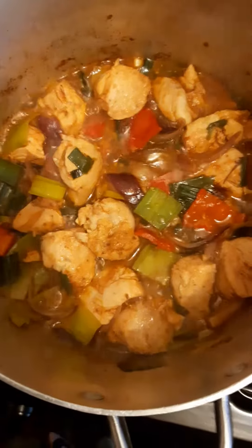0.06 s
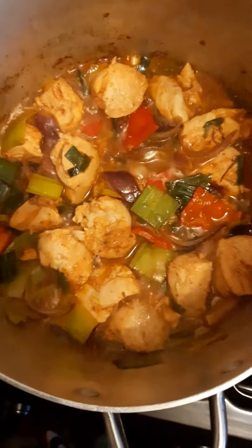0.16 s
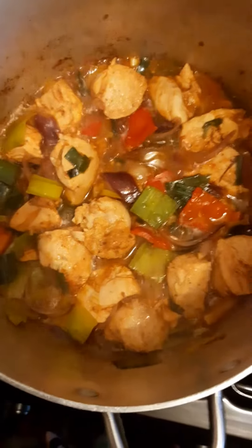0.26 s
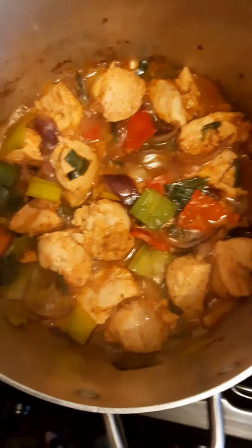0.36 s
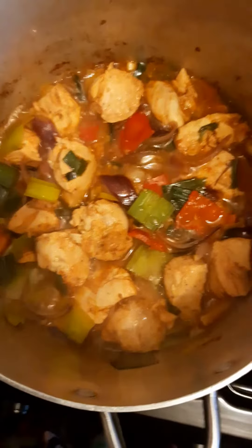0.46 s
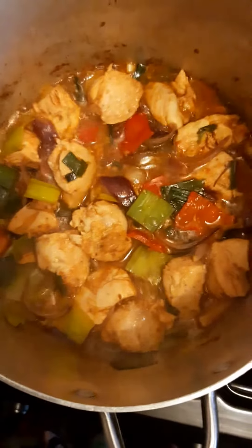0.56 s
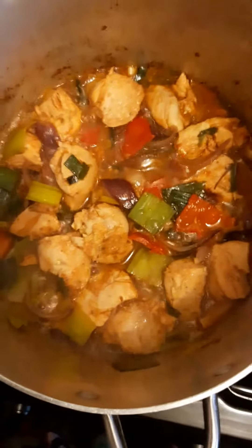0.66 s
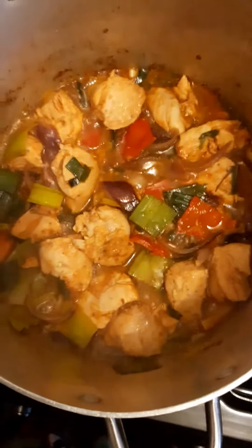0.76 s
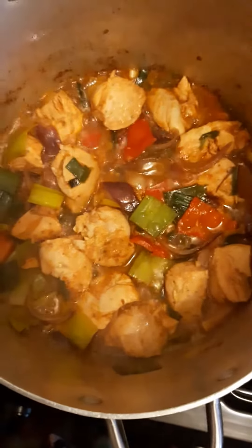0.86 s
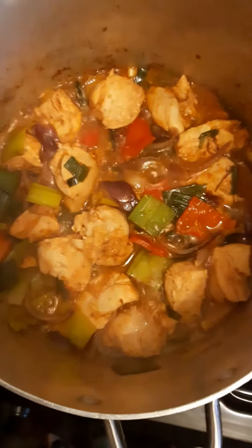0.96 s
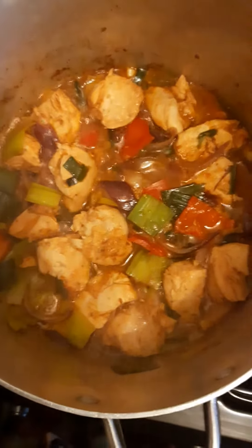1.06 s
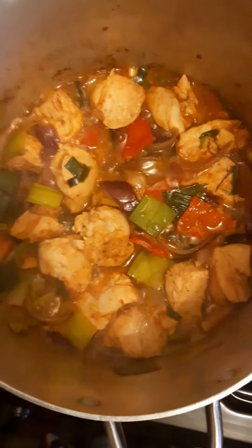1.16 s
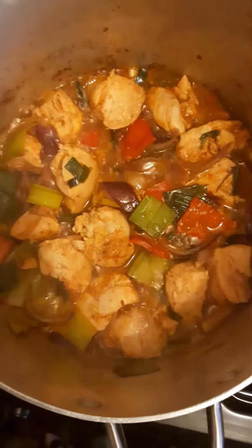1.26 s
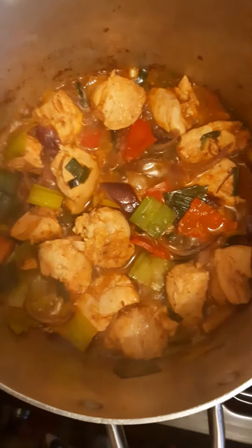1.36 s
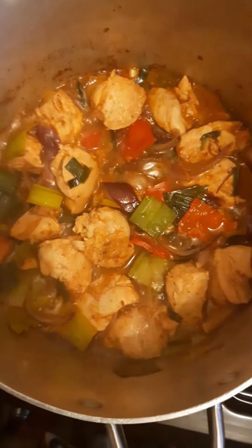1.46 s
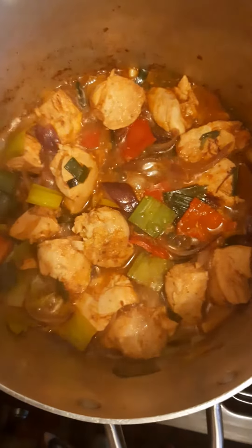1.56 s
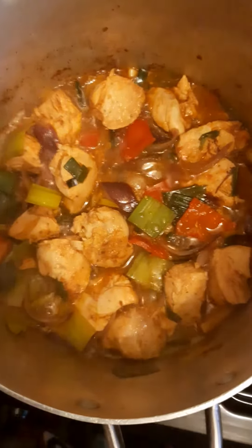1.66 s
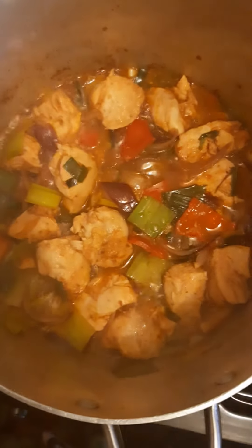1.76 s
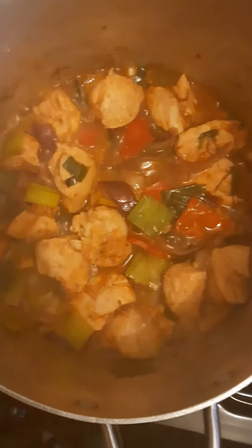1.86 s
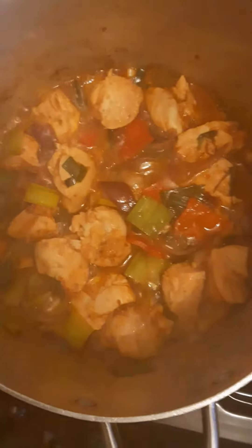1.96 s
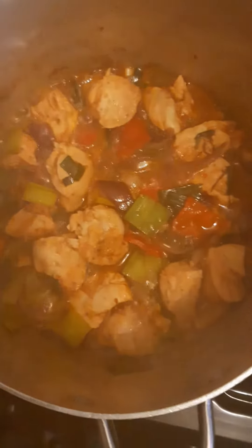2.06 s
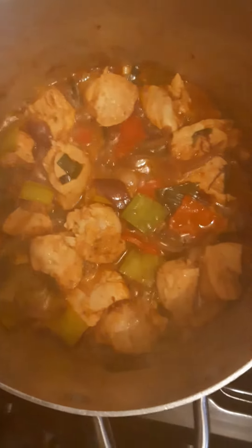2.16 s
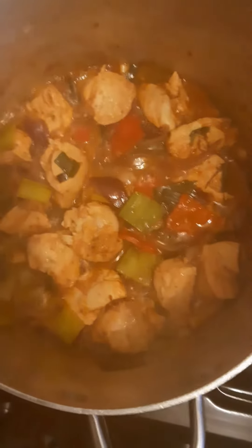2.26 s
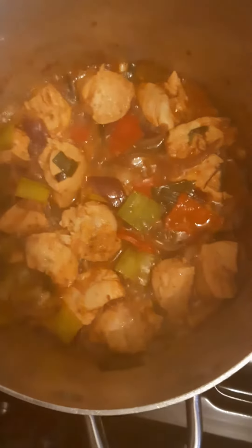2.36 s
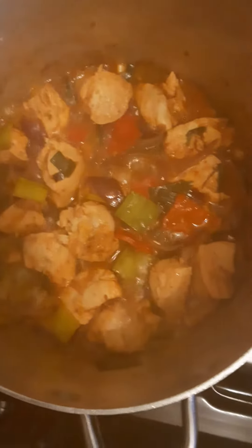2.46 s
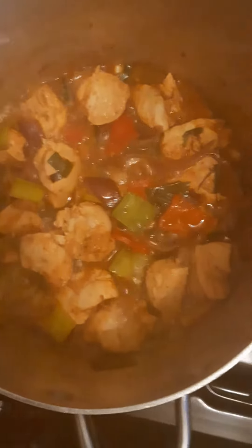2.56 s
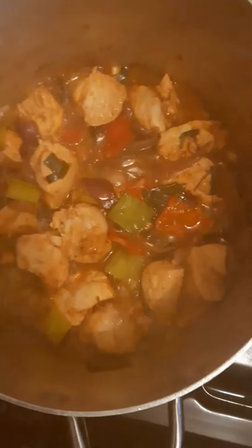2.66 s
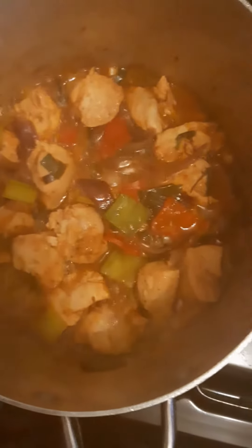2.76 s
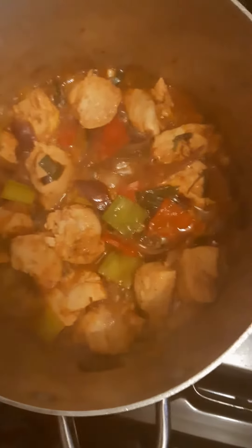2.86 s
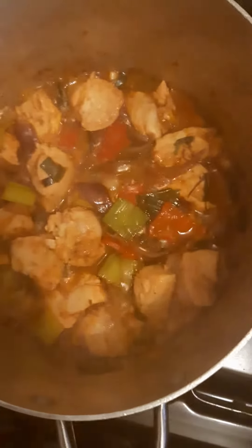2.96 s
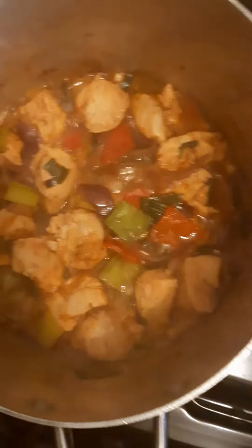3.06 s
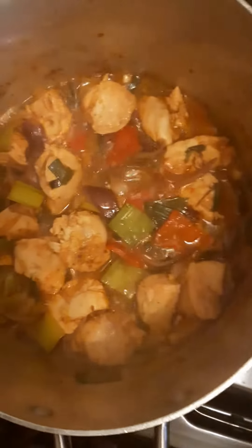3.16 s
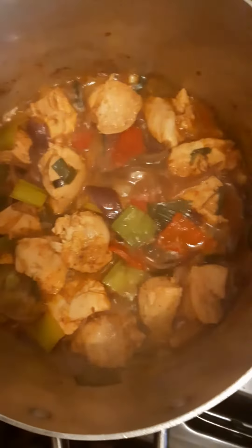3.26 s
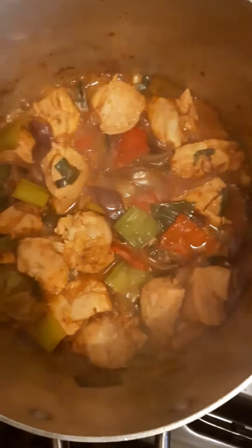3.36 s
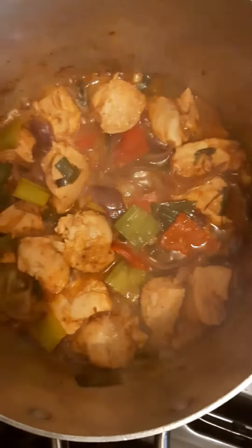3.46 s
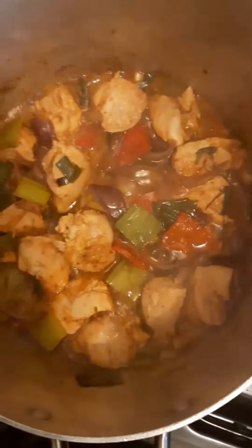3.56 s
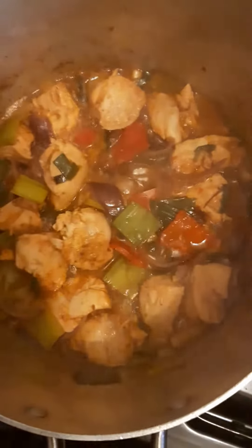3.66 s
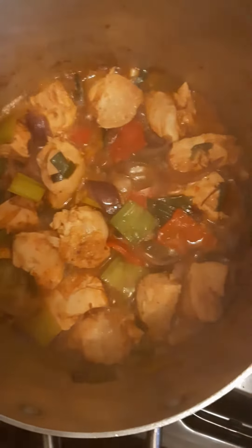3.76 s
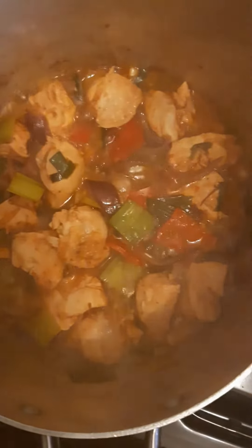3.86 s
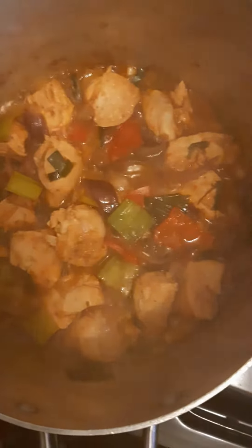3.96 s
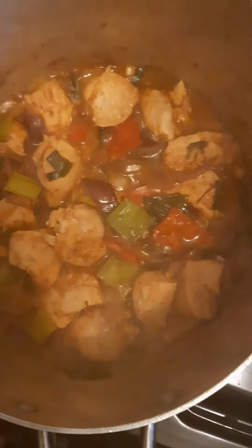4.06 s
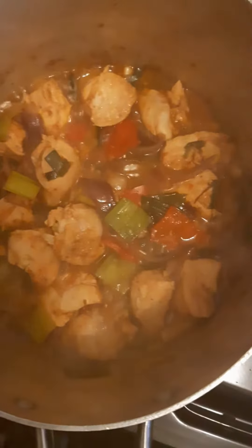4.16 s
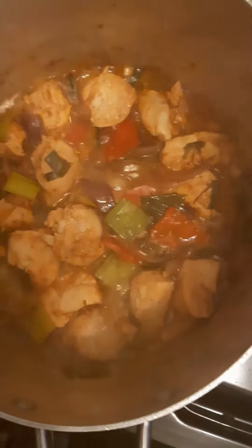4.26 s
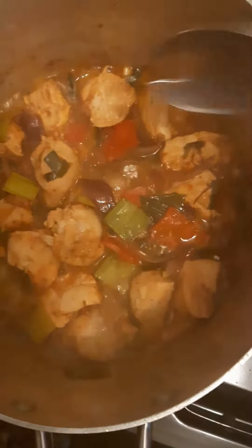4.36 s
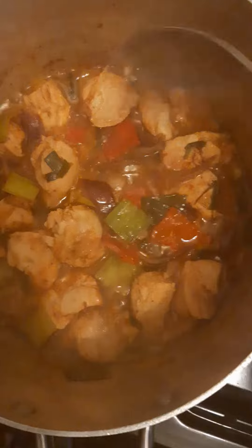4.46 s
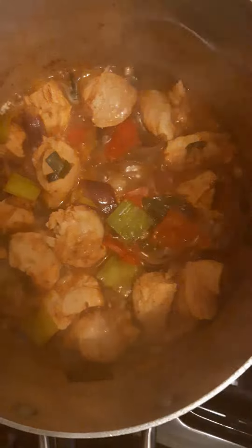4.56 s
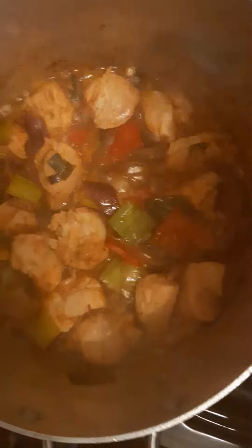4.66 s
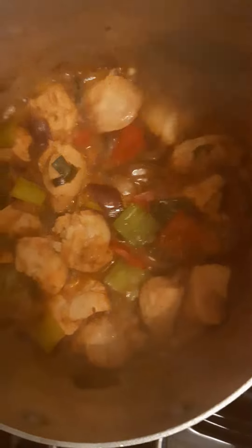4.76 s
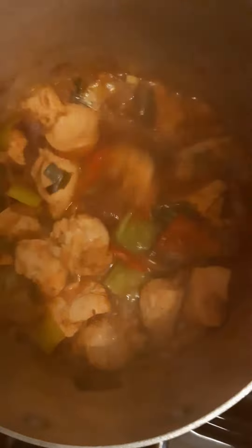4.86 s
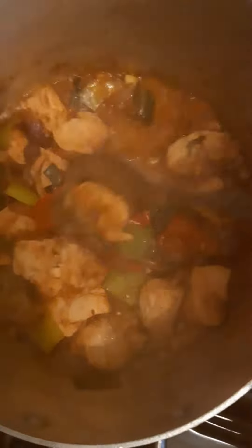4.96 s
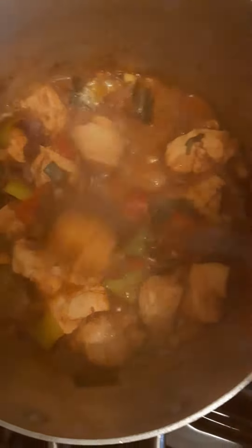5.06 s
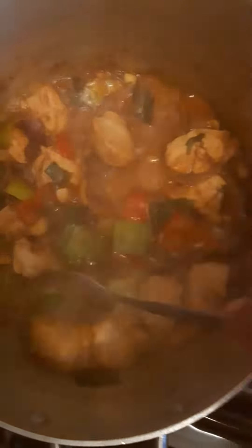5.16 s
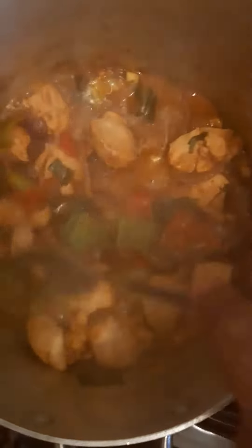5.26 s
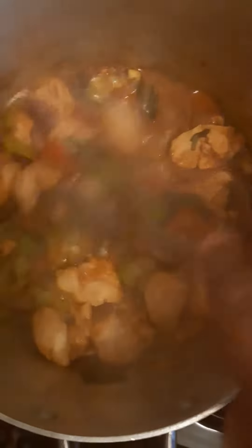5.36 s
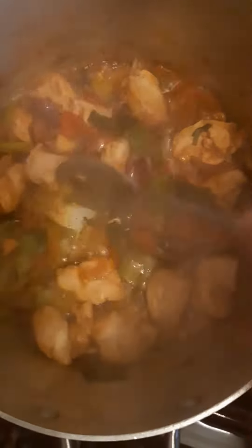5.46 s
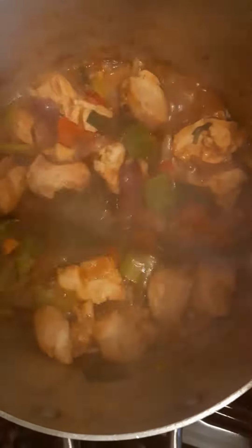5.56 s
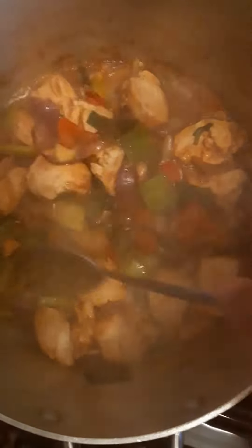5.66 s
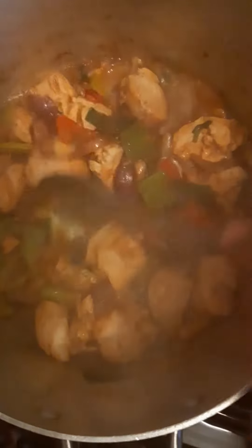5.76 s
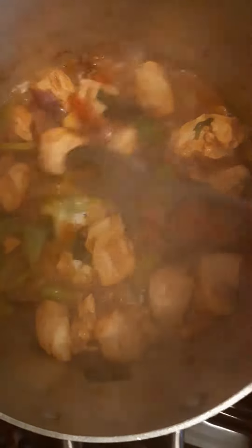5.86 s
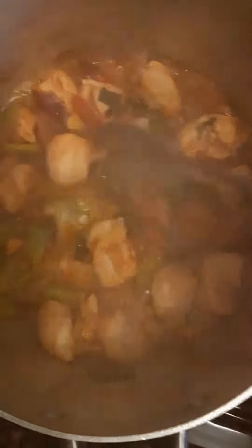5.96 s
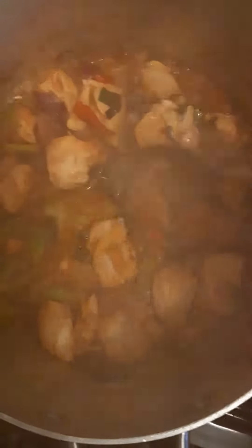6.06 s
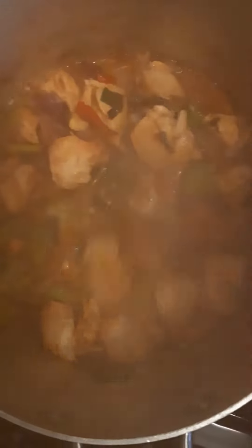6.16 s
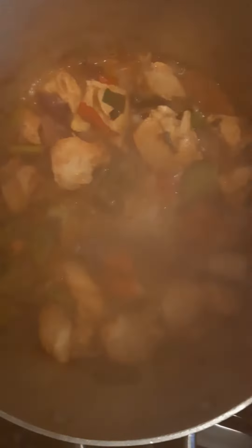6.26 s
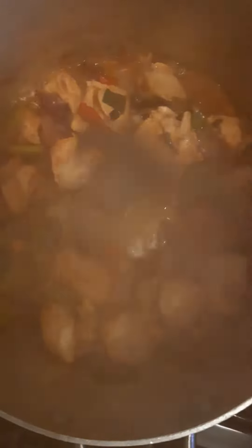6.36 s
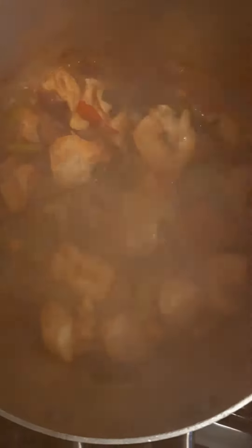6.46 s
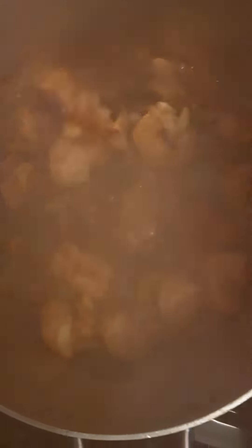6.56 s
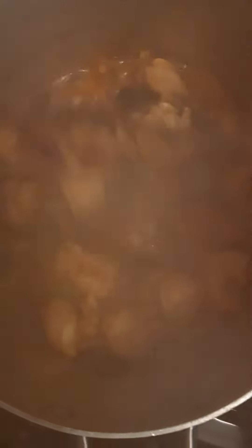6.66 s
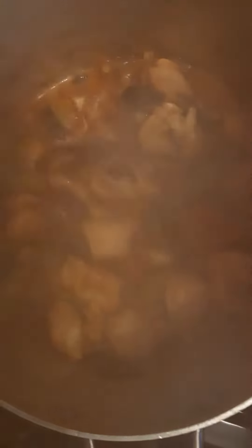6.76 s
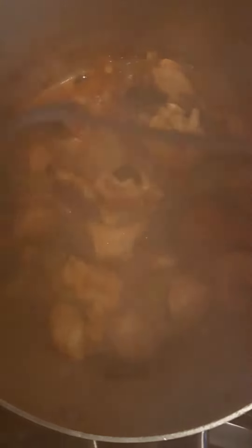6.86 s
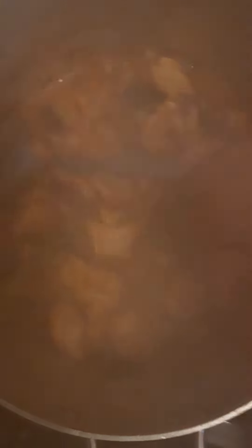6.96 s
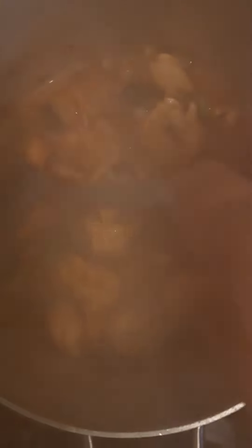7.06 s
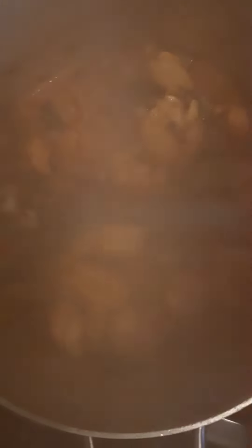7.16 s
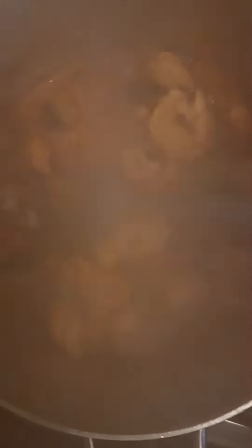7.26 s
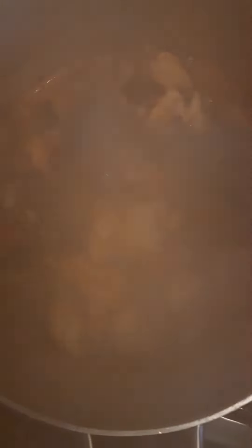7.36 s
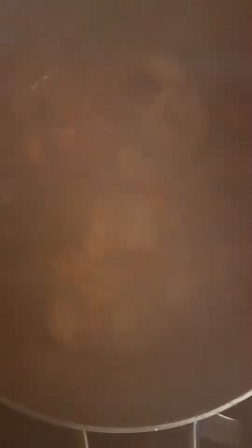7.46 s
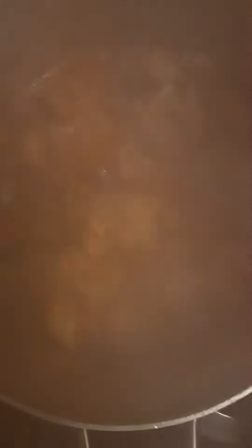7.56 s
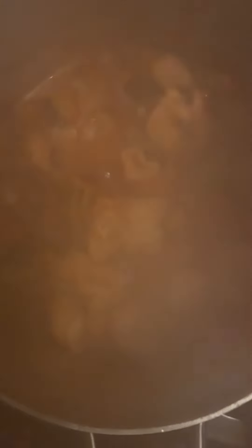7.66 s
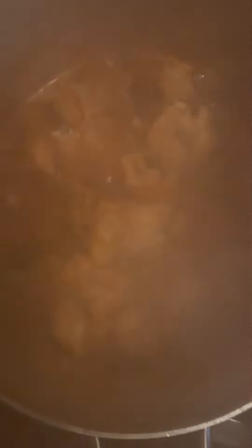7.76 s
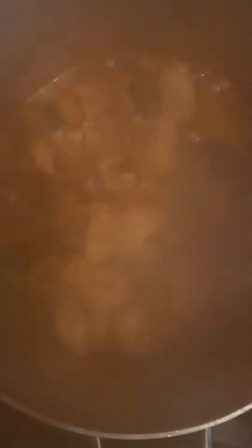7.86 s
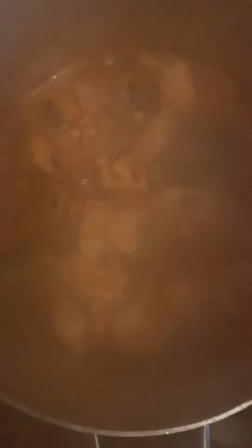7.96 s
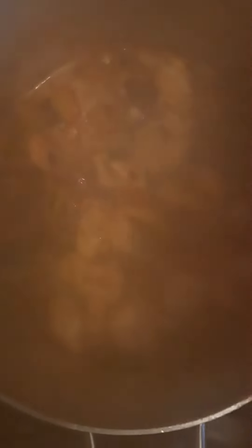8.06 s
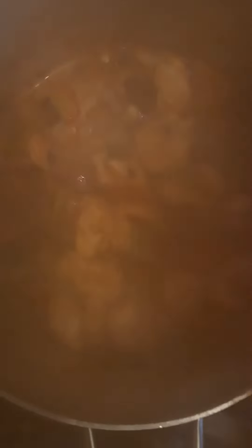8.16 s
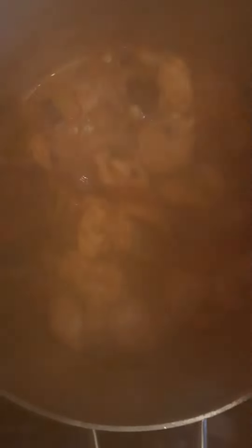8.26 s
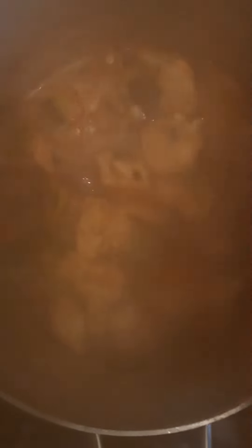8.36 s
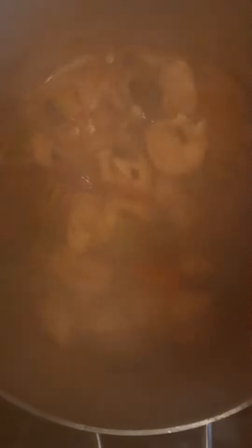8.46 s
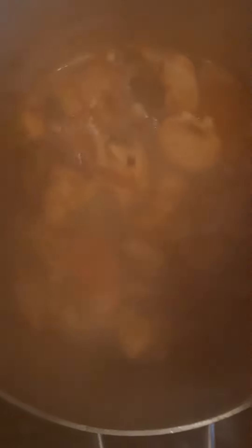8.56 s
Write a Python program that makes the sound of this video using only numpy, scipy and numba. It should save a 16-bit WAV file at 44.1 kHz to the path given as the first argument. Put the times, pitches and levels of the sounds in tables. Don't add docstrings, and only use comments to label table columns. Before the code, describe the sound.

Close over a steel pot in a small kitchen, stew bubbles in low plops under fine hiss and crackle, with occasional sharp fat spits and a thin high electric whine. A spoon slides and clinks from a glazed crock, then stirs, with bright metallic knocks, short scrapes and dull thuds of the rocking stove grate, busiest at the end.

```python
import sys
import numpy as np
from scipy import signal
from scipy.fft import rfft, irfft
from scipy.io import wavfile
from scipy.ndimage import uniform_filter1d
from numba import njit

SR = 44100
rng = np.random.default_rng(int(sys.argv[2]) if len(sys.argv) > 2 else 0)


def magnitude_from_level(level_db):
    exponent = np.asarray(level_db, float) / 20
    return 10 ** exponent


def unload_wav(signal):
    wavfile.write(
        sys.argv[1],
        SR,
        np.round(np.clip(np.atleast_2d(signal).T, -1, 1) * 32767).astype(np.int16),
    )


N = 379260
RING = SR // 3


def unit(x):
    return x / np.sqrt(np.mean(x ** 2) + 1e-18)


def curve(rows):
    s, *columns = np.transpose(rows)
    return [np.interp(np.arange(N) / SR, s, c) for c in columns]


def at_hz(points, hz):
    f, v = np.transpose(points)
    return np.interp(np.log(np.maximum(hz, 1)), np.log(f), v)


def band(x, lo_hz, hi_hz):
    return signal.sosfilt(signal.butter(2, (lo_hz, hi_hz), "bandpass", fs=SR, output="sos"), x)


def walk(rate_hz):
    k = int(SR / rate_hz)
    steps = np.repeat(rng.standard_normal(N // k + 1), k)
    return 0.32 * uniform_filter1d(uniform_filter1d(steps, k), k)[:N]


def add(out, s, sound, pan_db, lag=10):
    start = int(s * SR)
    for c, late in enumerate((0, lag)):
        i = start + late
        n = min(sound.shape[1], N - i)
        out[c, i:i + n] += sound[c, :n] * magnitude_from_level(pan_db * (.5 - c) - 4)


def whine():
    # time in seconds, level in dB.
    whine_level = [
        (0, -62),
        (.6, -60.5),
        (2.1, -59.5),
        (2.5, -72),
        (3.8, -68),
        (4.9, -59.5),
        (5.7, -66),
        (6.5, -79),
        (7.3, -76),
        (8.6, -85),
    ]
    db, = curve(whine_level)
    hz = 7840 + 11.3 * walk(22.5)
    tone = np.sqrt(2) * np.sin(2 * np.pi * np.cumsum(hz) / SR)
    return tone * magnitude_from_level(db + 1.2 * np.array([walk(4.5), walk(11.0)]))


def kitchen(x):
    # pitch in Hz, t60 in seconds, level in dB.
    echo_bands = [(400, 0.3, -8), (2000, 0.3, 1), (8000, 0.24, -3)]
    edges_hz = ((100, 900), (900, 4500), (4500, 16500))
    t = np.arange(RING) / SR
    mid, side = rng.standard_normal((2, RING)) * np.clip(t / 0.0006, 0, 1)
    tail = 0
    for (hz, t60_s, db), (lo_hz, hi_hz) in zip(echo_bands, edges_hz):
        noise = mid + min(hz / 1500, 1) * side * np.array([[1], [-1]])
        part = band(noise, lo_hz, hi_hz) * np.exp(-np.log(1000) * t / t60_s)
        energy = np.sum(part ** 2) / 2 / ((hi_hz - lo_hz) / (SR / 2))
        tail = tail + magnitude_from_level(db) * part / np.sqrt(energy)
    return signal.fftconvolve(x.mean(axis=0)[None], tail, axes=1)[:, :N]


def grate():
    # start in seconds, level in dB, pitch in Hz.
    thumps = [
        (3.367, -43, 109),
        (4.633, -36.5, 112),
        (5.78, -53, 139),
        (6.076, -36, 148),
        (6.238, -68, 82),
        (6.594, -36.5, 98.5),
        (7.576, -25, 138),
        (7.729, -36, 142),
        (8.138, -27, 137),
        (8.36, -31.5, 141),
    ]
    rumble_db, rumble_s = -5.5, 0.11
    out, t = np.zeros((2, N)), np.arange(RING) / SR
    for s, db, hz in thumps:
        wobble = t / 0.03 * np.exp(1 - t / 0.013) * np.sin(2 * np.pi * hz * t)
        swell = t / rumble_s * np.exp(-(t / rumble_s) ** 2)
        rumble = unit(band(rng.standard_normal(RING), 69, 243)) * swell
        add(out, s, magnitude_from_level(db) * np.tile(wobble + magnitude_from_level(rumble_db) * rumble, (2, 1)), pan_db=2.0)
    return out


def ring(modes, edges_hz, crash, lively_hz, rings, push, scatter_db=1.75, lively_db=7, clear=False):
    away_db_per_octave, choke_s = 5, .115
    contact_cycles, slip_rattle_db = 2.5, 0
    hz, db, t60_s = np.array(modes).T[:, :, None]
    crash_db, crash_s, wash_db, wash_s, beating, beat_hz, contact_db = crash
    t = np.arange(RING) / SR
    chance = np.clip(rng.standard_normal((4, len(hz), 1)), -1.5, 1.5)
    lively_hz, rings = np.clip(lively_hz, *edges_hz), np.clip(rings, .2, 2.5)
    octaves_off = np.abs(np.log2(hz / lively_hz))
    lively = (octaves_off == octaves_off.min()) & (octaves_off < .12)
    db = db + scatter_db * chance[1] + lively_db * lively - away_db_per_octave * octaves_off
    t60_s, wash_s = t60_s * rings, wash_s * np.sqrt(rings)

    knots = rng.standard_normal((len(hz), 400))
    waver = np.array([np.interp(t * beat_hz, np.arange(400), k) for k in knots])
    beats = 1 + beating * np.where(lively, .3, 1) * waver
    decay = np.exp(-np.log(1000) * t / t60_s - (t / choke_s) ** 4)
    fade = magnitude_from_level(db) * beats / np.hypot(1, beating) * decay
    if clear:
        fed = signal.fftconvolve(fade ** 2, push[None] ** 2, axes=1)[:, :RING]
        fade = np.sqrt(np.abs(fed))
    apart = np.clip(hz / 2500, 0, 1) * chance[2:] * np.array([1.5, 1])[:, None, None]
    phase = 2 * np.pi * hz * (1 + chance[0] / 700) * t
    left = (fade * magnitude_from_level(apart[0]) * np.sin(phase)).sum(axis=0)
    right = (fade * magnitude_from_level(-apart[0]) * np.sin(phase + apart[1])).sum(axis=0)
    tones = np.array([left, right])

    noise = rng.standard_normal((2, RING))
    mid = .9 * unit(band(noise, *edges_hz))
    side = unit(band(noise, lively_hz / 1.3, lively_hz * 1.3))
    rattle = unit(mid + min(edges_hz[0] / 3000 + 1.1, .7) * side * np.array([[1], [-1]]))
    rattle = rattle * (magnitude_from_level(crash_db) * np.exp(-t / crash_s) + magnitude_from_level(wash_db) * np.exp(-t / wash_s))
    contact = np.sin(2 * np.pi * lively_hz * t) * np.exp(-(t * lively_hz / contact_cycles) ** 2)
    rattle = rattle + magnitude_from_level(contact_db) * contact
    rattle = np.sqrt(np.sum(magnitude_from_level(db) ** 2)) * rattle

    if clear:
        driven = magnitude_from_level(slip_rattle_db) * rattle
    else:
        driven = tones * magnitude_from_level(-3 * (len(push) > 1)) + rattle
    pushed = signal.fftconvolve(driven, push[None], axes=1)[:, :RING]
    sound = band(pushed + clear * tones, edges_hz[0] * .8, edges_hz[1] * 1.1)
    return sound / np.sqrt(uniform_filter1d(np.mean(sound ** 2, axis=0), size=220).max())


def hush_bands(sound, s):
    # from in seconds, to in seconds, silent band in Hz, width in Hz.
    silent_bands = [(6.06, 6.13, 5200, 800), (6.06, 6.13, 2410, 400), (7.47, 7.5, 14400, 2000),
                    (7.47, 7.5, 4930, 500), (7.54, 7.6, 5140, 1300), (7.54, 7.6, 8900, 800),
                    (7.54, 7.6, 14400, 1500), (3.6, 3.63, 4000, 300), (3.1, 3.4, 2000, 160), (3.1, 3.2, 780, 200),
                    (3.3, 3.4, 3590, 200), (3.6, 3.63, 1500, 250), (6.06, 6.13, 980, 150),
                    (6.5, 6.53, 14500, 1800), (8.07, 8.09, 1663, 200), (3.6, 3.63, 6840, 500)]
    for start, end, hz, width_hz in silent_bands:
        if start < s < end:
            edges_hz = (hz - width_hz / 2, hz + width_hz / 2)
            stop = signal.butter(2, edges_hz, "bandstop", fs=SR, output="sos")
            sound = signal.sosfilt(stop, sound)
    return sound


def spoon(body, edges_hz, crash, lags, knocks, drags, drag_db, rasp_db, clear):
    pans_db = (2, 0, .2)
    peak_share, fall_db = 0.35, 4.5
    drag_rings = .7
    out = np.zeros((2, N))
    for rows, lag, pan_db, *part in zip(knocks, lags, pans_db, body, edges_hz, crash):
        for s, db, lively_hz, rings in rows:
            sound = ring(*part, lively_hz, rings, np.ones(1))
            add(out, s, magnitude_from_level(db) * hush_bands(sound, s), pan_db, lag)
    for s, length_s, db, bright_db, lively_hz in drags:
        chance = rng.standard_normal((3, SR // 5))[:, :int(length_s * SR)]
        along = np.linspace(0, 1, chance.shape[1])
        pressure_db = -fall_db * ((along - peak_share) / .5) ** 2
        slips = chance[0] * (chance[1] > 1.7) * magnitude_from_level(4.5 * chance[2] + pressure_db)
        slips = slips * signal.windows.tukey(len(along), .3)
        parts_db = (db + bright_db + rasp_db, db - bright_db, db)
        for part_db, lag, pan_db, *part in zip(parts_db, lags, pans_db, body, edges_hz, crash):
            sound = ring(*part, lively_hz, drag_rings, slips, lively_db=drag_db, clear=clear)
            add(out, s, magnitude_from_level(part_db) * hush_bands(sound, s), pan_db, lag)
    return out


def draw_from_crock():
    # pitch in Hz, level in dB, t60 in seconds.
    crock = [
        [(4340, 9, 0.2), (4853, -2, 0.16), (5105, -4, .2), (5700, -13, 0.13), (6240, 2, .2), (7500, -6, .1), (8689, -4, .15), (10400, -9, .08), (12030, -3, .15), (14400, -3, .08)],
        [(778, 8, 0.34), (991, -10, .12), (1044, -5, 0.13), (1113, -2, .12), (1223, -4, 0.14)],
        [(1781, -7, 0.2), (1810, -10, .15), (1986, 0, .3), (2595, -10, 0.22), (2883, 3, 0.21), (3388, 3, 0.15), (3502, 2, .15), (3591, 1, 0.2)],
    ]
    # crash in dB, in s, wash in dB, in s, beat depth, beat rate in Hz, dull contact push in dB.
    clink = [
        (2., .003, -7., .025, .5, 150, -12),
        (-8., .003, -15., .02, .12, 40, -12),
        (-2., .003, -12., .025, .25, 70, -14),
    ]
    # start in seconds, level in dB, liveliest pitch in Hz, ring as share of free decay.
    taps = [
        [(3.5532, -38.5, 4380, 1.4), (3.6162, -16.5, 5380, 1.3)],
        [(3.5532, -30, 1030, 0.36), (3.6164, -13, 1167, 1)],
        [(3.5532, -39, 1986, 0.61), (3.6162, -14, 3591, 0.98), (3.6164, -21.5, 1970, 1.24)],
    ]
    # start in seconds, length in seconds, level in dB, brightness in dB, liveliest pitch in Hz.
    drags = [
        (3.159, 0.06, -37.5, 3, 1781),
        (3.309, 0.093, -36.5, -2.5, 786),
        (3.55, 0.049, -36.5, -11, 1216),
    ]
    edges_hz, lags = ((4200, 15000), (650, 1400), (1500, 4500)), (8, 6, 4)
    return spoon(crock, edges_hz, clink, lags, taps, drags, drag_db=10., rasp_db=-12, clear=True)


def stir_pot():
    # pitch in Hz, level in dB, t60 in seconds.
    pot = [
        [(4670, -27, 0.088), (5300, 4, 0.49), (5750, -13, 0.27), (6150, 8.5, 0.4), (6450, 13.5, 0.36), (7500, -3, 0.069), (8750, -4, 0.055), (8900, -10, .1), (10840, 13, 0.087), (9520, -13, 0.11), (12100, 4, 0.11), (12900, -8, .15), (7200, 1, .15)],
        [(188, -10, 0.21), (253, 0, 0.33), (330, -0.5, 0.43), (420, 0.5, 0.32), (513, 0.5, 0.14), (660, -2.5, 0.13), (740, -2, 0.25), (781, -7, 0.22), (840, -7, 0.21)],
        [(1050, -6.5, 0.6), (1663, -1, 0.14), (1970, -32, 0.16), (2190, -4, 0.13), (2428, 1, 0.084), (2740, 0.5, 0.1), (2885, 1, 0.13), (3400, -6, 0.18), (3500, -3, 0.16), (3640, -1, 0.14), (3780, -4, 0.19), (3950, -23, 0.23), (4250, -12, 0.15)],
    ]
    # crash in dB, in s, wash in dB, in s, beat depth, beat rate in Hz, dull contact push in dB.
    crash = [
        (10., .002, -3., .02, 3., 450, -5),
        (0., .004, -6., .028, 1., 50, -5),
        (2., .003, -11., .021, .6, 85, -7),
    ]
    # start in seconds, level in dB, liveliest pitch in Hz, ring as share of free decay.
    edge_knocks = [(4.601, -25.5, 5460, 1.5), (4.7556, -15.5, 10800, 1.5), (4.7705, -17, 6400, 1.2),
                   (5.4108, -30, 8800, 0.7), (6.0657, -10.5, 7250, 1.2), (6.1107, -18, 9100, 1.1),
                   (6.1175, -24, 6150, 1), (6.5108, -3.5, 12100, 0.81), (7.4816, -10.5, 7000, 1.1),
                   (7.5523, -12.5, 12100, 0.64), (7.5526, -16, 7200, .9), (7.4818, -33, 12900, 1.2),
                   (6.1858, -38, 6150, .3), (5.3325, -34, 5300, 0.33), (5.3995, -33, 6150, .3),
                   (7.7065, -26.5, 7160, 0.76), (7.7215, -28, 6150, 1.1), (7.737, -20, 5300, 0.93),
                   (7.7535, -19.5, 6300, .8), (7.7815, -30, 9200, 0.54), (8.0766, -11, 5850, 0.62),
                   (8.128, -25.5, 9500, 1.3), (6.511, -15, 6150, .7), (8.2445, -27, 6700, 0.72),
                   (8.337, -16, 5300, 1.2), (8.3624, -22, 5300, 0.68), (8.3855, -23.5, 6150, 0.79)]
    base_knocks = [(4.601, -26.5, 253, 3.4), (4.603, -29.5, 420, 2.5), (4.7014, -26.5, 270, 1.2),
                   (4.7578, -24.5, 423, 1.3), (4.769, -38, 783, 0.91), (4.797, -38, 260, 1.7),
                   (5.3968, -36, 520, 0.47), (6.066, -9.5, 504, 0.71), (6.085, -24.5, 330, 0.69),
                   (6.07, -24, 262, 0.61), (6.187, -33.5, 513, 0.45), (4.758, -32, 781, 1),
                   (8.13, -16.5, 830, 0.97), (8.213, -28, 830, .6), (6.111, -23, 306, 2.5),
                   (6.513, -25.5, 474, 2.2), (6.525, -30.5, 253, 3.5), (6.8227, -34, 352, 0.75),
                   (6.981, -39.5, 517, 0.54), (7.483, -27.5, 420, 3.9), (7.552, -19, 323, 0.98),
                   (7.554, -25, 647, 2), (7.652, -29.5, 333, 1.6), (7.7067, -23, 330, 0.8),
                   (7.729, -24, 660, 1.8), (7.753, -19, 680, 3.1), (8.077, -25.5, 407, 2.6),
                   (8.128, -9, 255, 0.46), (8.1389, -14, 260, 0.22), (8.176, -21.5, 303, 0.72),
                   (8.2, -20.5, 255, 0.97), (8.215, -36, 260, 0.73), (8.337, -20.5, 328, 1.2),
                   (8.3609, -32, 339, 1.4), (8.385, -27.5, 333, 2.7)]
    wall_knocks = [(4.602, -17, 2830, 0.61), (4.605, -21, 1740, 1), (4.7563, -25, 2690, 0.8),
                   (4.768, -24.5, 2720, 1.4), (5.3983, -30.5, 1170, 0.36), (5.4107, -32.5, 3000, 0.52),
                   (6.0659, -19, 1470, 0.15), (6.067, -29, 4140, 0.74), (6.1098, -40, 3500, 0.7),
                   (6.1176, -26, 3500, 1.1), (6.1864, -33, 2900, 0.34), (6.5112, -13, 2885, 1.1),
                   (6.513, -20, 1663, 2.4), (6.5116, -21, 3400, 0.7), (6.979, -40, 2060, 0.95),
                   (7.4823, -16, 3950, 1.06), (7.486, -29.5, 1663, 2.5), (7.484, -23.5, 1020, 1.5),
                   (7.4846, -19, 2428, 0.95), (7.557, -28.5, 3780, 0.43), (8.3627, -24, 1040, .2),
                   (6.8243, -42, 1680, .25), (7.5527, -20, 3700, 0.25), (7.552, -42, 1300, 0.8),
                   (7.65, -29, 2428, 0.73), (7.7078, -20, 2320, 1.1), (7.739, -21, 3640, 0.89),
                   (7.7542, -18.5, 2190, 0.73), (7.7803, -28, 2690, 0.81), (8.0775, -16.5, 2200, 0.64),
                   (8.078, -17.5, 2885, 2), (8.128, -15, 1030, 0.14), (8.1361, -17.5, 1970, 0.84),
                   (8.228, -28, 2885, 0.98), (8.3007, -38, 1610, 0.29), (8.337, -18, 2190, 1.3),
                   (8.361, -24, 1663, .6), (8.364, -27, 2690, 1.1)]
    # start in seconds, length in seconds, level in dB, brightness in dB, liveliest pitch in Hz.
    scrapes = [
        (4.742, 0.049, -24.5, 0, 2770),
        (5.134, 0.047, -42, 2.5, 1440),
        (5.382, 0.036, -37.5, 0.5, 513),
        (5.709, 0.078, -47.5, -8, 188),
        (6.102, 0.02, -31, 8.5, 3500),
        (7.575, 0.19, -36.5, 3.5, 12100),
        (7.702, 0.075, -24.5, 1.5, 2190),
        (8.198, 0.06, -28.5, -1, 7300),
        (8.365, 0.09, -32, -6.5, 5300),
    ]
    edges_hz, lags = ((4300, 15500), (210, 900), (1000, 4500)), (10, 10, 6)
    knocks = (edge_knocks, base_knocks, wall_knocks)
    return spoon(pot, edges_hz, crash, lags, knocks, scrapes, drag_db=4., rasp_db=-1.5, clear=False)


@njit
def grains(n, start, hz, cycles, size, glide):
    out = np.zeros((2, n))
    for g in range(len(start)):
        length = int(cycles[g] * SR / hz[g])
        phase, fade = 0., np.exp(-5.8 / length)
        level = 1.
        for i in range(min(length, n - start[g])):
            phase += 2 * np.pi * hz[g] * (1 + glide * i / length) / SR
            level *= fade
            out[0, start[g] + i] += size[0, g] * level * np.sin(phase)
            out[1, start[g] + i] += size[1, g] * level * np.sin(phase)
    return out


def swarm(count, hz, octaves, cycles, spread_db, pan_db, glide):
    u, g = rng.random((count, 2)).T, rng.standard_normal((count, 3)).T
    size = magnitude_from_level(-spread_db * np.log(np.maximum(u[1], 1 / 25))) * np.sign(g[0])
    size = size * magnitude_from_level(np.clip(g[1], -2, 2) * np.array([[1], [-1]]) * pan_db / 2)
    pitch_hz = np.clip(hz * 2 ** (octaves * g[2]), 100, 15000)
    start = (u[0] * N).astype(np.int64)
    return unit(grains(N, start, pitch_hz, cycles * (1 + np.abs(g[0])), size, glide))


def spits():
    # start in seconds, level in dB, pitch in Hz, left minus right in dB.
    droplets = [(0.8129, -20, 8260, -14), (2.0984, -23, 6900, 4), (2.4025, -19, 10400, -15),
                (2.734, -38, 7000, 12), (2.978, -21.5, 11700, -3), (3.522, -25, 4370, -3),
                (3.6996, -15, 4230, 2), (5.035, -25.5, 5700, -9), (5.3332, -22.5, 4080, -10),
                (5.589, -30, 2010, 2.0), (5.9807, -29, 1960, 10), (6.185, -24, 2850, 2.5),
                (6.392, -26, 2260, 8), (6.8085, -32, 3050, -1), (6.824, -28, 1660, 6),
                (8.0052, -47, 6000, -23), (8.529, -28, 2220, 1), (8.5673, -29, 1520, 3)]
    s, db, hz, pan_db = np.transpose(droplets)
    size = magnitude_from_level(db - 6.0 + np.array([pan_db, -pan_db]) / 2)
    return grains(N, (s * SR).astype(np.int64), np.clip(hz, 1000, 15000), 0 * s + 8.2, size, 0.)


def sizzle(sizzle_db):
    # pitch in Hz, level in dB per Hz; the peak at 92 Hz is a low electric hum.
    hiss_colour = [(24, -70), (40, -24), (70, -33), (92, -11), (293, -24.5), (332, 6), (473, 0),
                   (523, 10.5), (578, -3), (1540, -22.5), (2040, -17), (7370, -20.5), (8150, -21.5),
                   (15300, -22), (16500, -87)]
    # pitch in Hz, likeness of left and right 0-1.
    likeness = [(60, 0.9), (130, 0.73), (290, 0.2), (640, 0.12), (1410, 0.05), (3100, 0), (6820, 0),
                (15000, 0)]
    # pitch in Hz, left minus right in dB.
    lean_points = [(60, 9.5), (200, -10), (700, 6), (1290, 4), (2380, -0.5), (4400, 1.5), (8120, 1),
                   (15000, 5)]
    # pitch in Hz, width in Hz, gain in dB.
    air = [(230, 16, 1), (570, 21, -5.5), (1111, 51, 9.5), (1730, 1000, 6), (3060, 510, -5.5)]
    hz = np.fft.rfftfreq(N, 1 / SR)
    alike = np.sqrt(np.clip(at_hz(likeness, hz), 0, .98))
    mid, side = rfft(rng.standard_normal((2, N)))
    mid, side = np.sqrt(1 + alike) * mid, np.sqrt(1 - alike) * side
    pair = np.array([mid + side, mid - side])
    lean_db = at_hz(lean_points, hz)
    bubble_gap_db = 8.97 * np.exp(-(np.log(np.maximum(hz, 1) / 440) / 1.065) ** 2)
    air_db = sum(db / (1 + (2 * (hz - f) / width_hz) ** 2) for f, width_hz, db in air)
    colour_db = at_hz(hiss_colour, hz) - bubble_gap_db + air_db
    hiss = irfft(pair * magnitude_from_level(colour_db + np.array([lean_db, -lean_db]) / 2), N)
    hiss = hiss / np.std(band(hiss, 2700, 18400))
    crackle = swarm(count=5000, hz=9550, octaves=0.77, cycles=3.5, spread_db=2.5, pan_db=14.0, glide=0.)
    fizz = swarm(count=1500, hz=1833, octaves=0.442, cycles=15.0, spread_db=5.0, pan_db=11.0, glide=0.41)
    clumps = np.clip(walk(45) + .12 * walk(8), -1.5, 1.3)
    top = band(hiss, 2500, 16500)
    hiss = magnitude_from_level(-1.0) * (hiss + (magnitude_from_level(9.9 * clumps) - 1) * top)
    crackle = magnitude_from_level(-3 + 5.5 * clumps) * band(crackle, 3000, 16500)
    return (hiss + crackle + magnitude_from_level(-12.0) * fizz) * magnitude_from_level(sizzle_db)


def boil(bubble_db):
    # pitch in Hz, level in dB, t60 in seconds.
    hollow_modes = [(273, 4, 0.029), (346, -4.5, 0.078), (407, -8, 0.25), (439, 1, 0.089),
                    (504.5, -8, 0.35), (558, -5, 0.14), (627, 4, 0.13), (763, 6, 0.013)]
    plops = swarm(count=2600, hz=464.0, octaves=0.38, cycles=2.07, spread_db=-0.5, pan_db=-3.5, glide=0.3)
    plops = band(plops, 290, 1000)
    hz, db, t60_s = np.array(hollow_modes).T[:, :, None]
    t = np.arange(RING // 2) / SR
    hollow = (magnitude_from_level(db) * np.sin(2 * np.pi * hz * t) * np.exp(-np.log(1000) * t / t60_s)).sum(axis=0)
    rung = signal.fftconvolve(plops, hollow[None], axes=1)[:, :N]
    surge_db = 1.8 * walk(6)
    pan_db = np.array([[.6], [-.6]])
    return unit(plops + magnitude_from_level(-4.0) * unit(rung)) * magnitude_from_level(bubble_db + surge_db + pan_db)


def scene():
    # time in seconds, sizzle level in dB.
    heat = [
        (0, -53),
        (1.5, -53.5),
        (3, -53.5),
        (4.2, -53),
        (5.3, -52.5),
        (6.3, -55),
        (7.3, -56),
        (8, -53),
        (8.6, -53.5),
    ]
    heat_db, = curve(heat)
    bubble_db = -51.5 + 2 * (heat_db - heat_db.mean())
    stew = boil(bubble_db) + sizzle(heat_db + 3)
    hits = stir_pot() + draw_from_crock()
    return stew + spits() + whine() + grate() + hits + kitchen(hits)


def low_pass(x):
    return signal.sosfilt(signal.butter(12, 17070, fs=SR, output="sos"), x)


def record(dry):
    x = signal.sosfilt(signal.butter(2, 45., "highpass", fs=SR, output="sos"), dry)
    x = signal.sosfilt(signal.ellip(10, .3, 90, 15800, fs=SR, output="sos"), x)
    return low_pass(np.tanh(x))


dry = scene()
out = record(dry)
unload_wav(out)
```